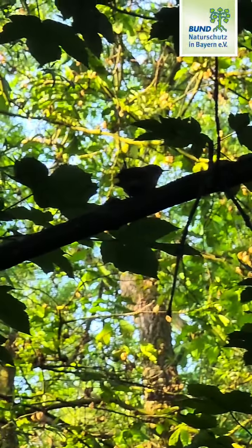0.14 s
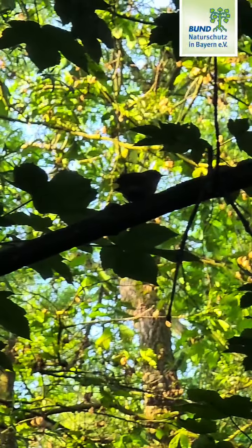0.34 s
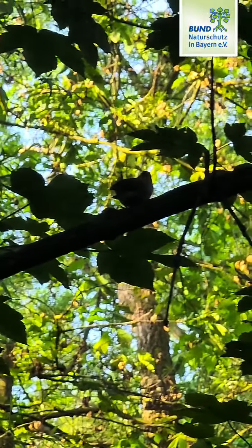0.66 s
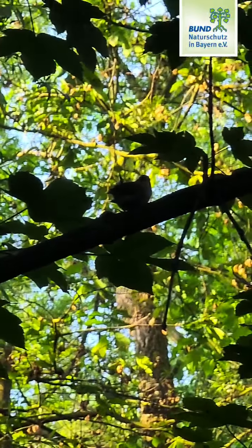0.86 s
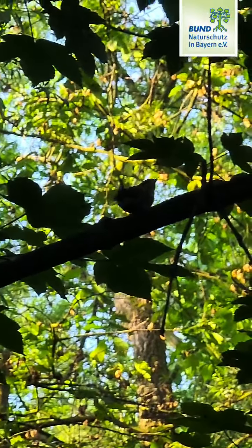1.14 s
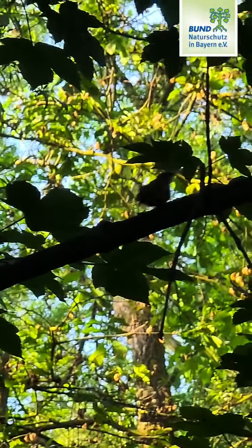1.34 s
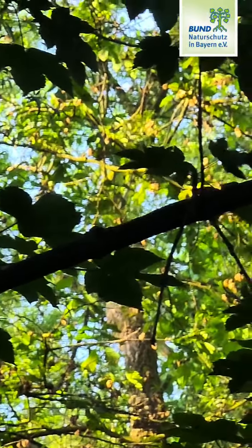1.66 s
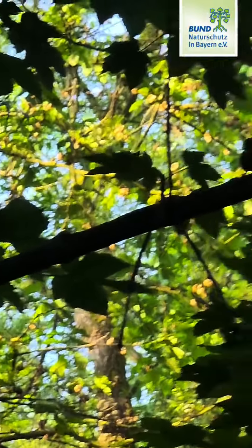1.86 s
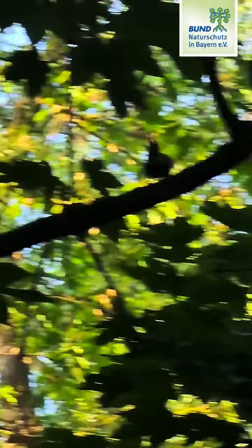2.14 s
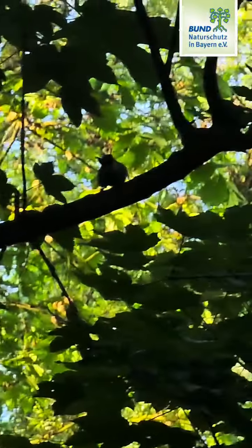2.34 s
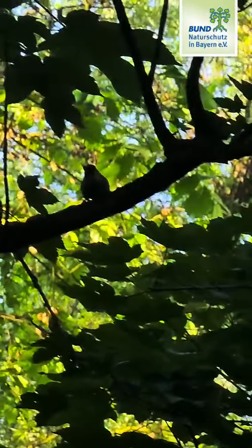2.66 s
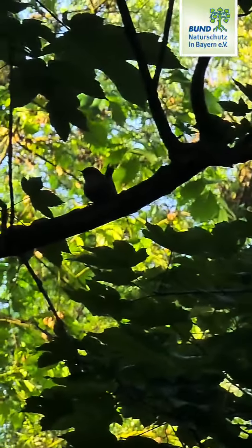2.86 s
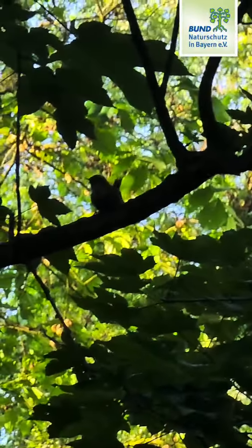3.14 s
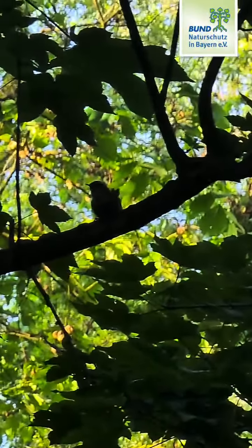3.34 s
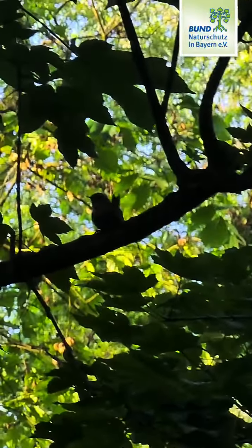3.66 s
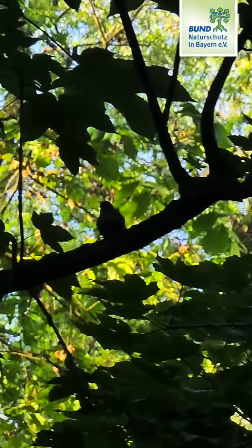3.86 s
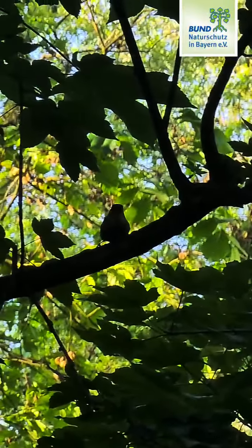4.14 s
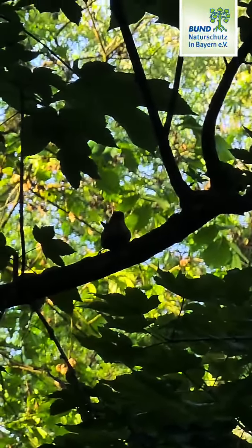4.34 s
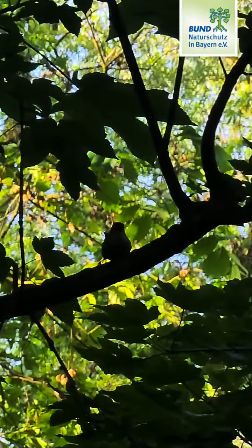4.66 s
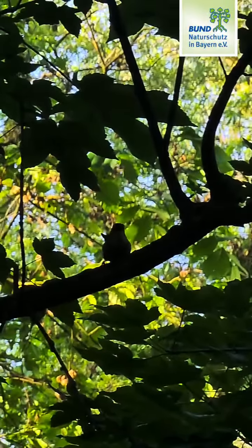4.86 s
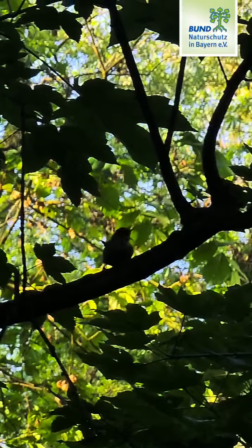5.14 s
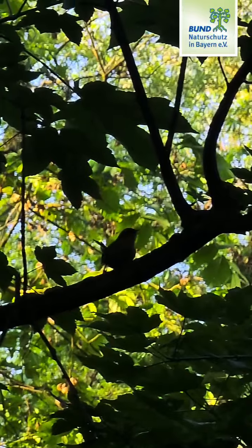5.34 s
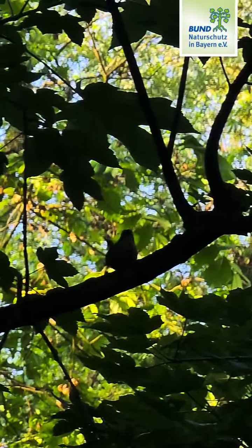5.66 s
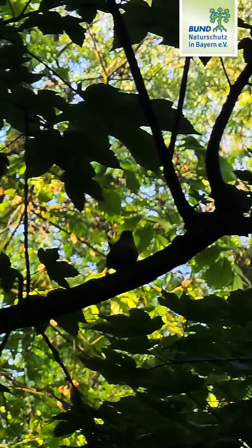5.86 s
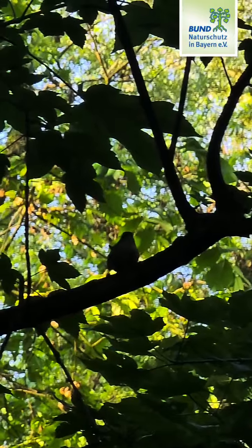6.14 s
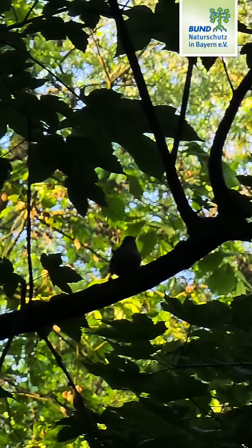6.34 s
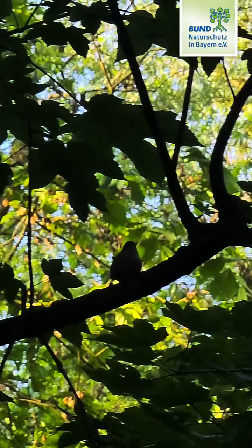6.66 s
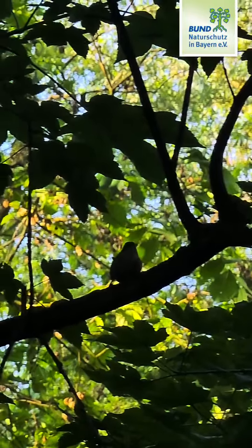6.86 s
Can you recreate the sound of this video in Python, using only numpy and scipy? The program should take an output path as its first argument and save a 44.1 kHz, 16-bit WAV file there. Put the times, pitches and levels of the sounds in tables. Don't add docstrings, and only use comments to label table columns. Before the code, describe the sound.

Distant thrush notes and a thin finch phrase open a leafy wood, then a close small bird bursts into piercing, fast, slurred whistles and trills.

```python
import sys
import numpy as np
from scipy import signal
from scipy.fft import rfft, irfft, next_fast_len
from scipy.io import wavfile
from scipy.ndimage import uniform_filter1d, minimum_filter1d

SR = 44100
rng = np.random.default_rng(int(sys.argv[2]) if len(sys.argv) > 2 else 0)


def ratio_of_db(decibels):
    return 10 ** (np.asarray(decibels, float) / 20)


def master(y):
    cut = np.clip(np.atleast_2d(y).T, -1, 1)
    pcm = np.round(cut * 32767)
    wavfile.write(sys.argv[1], SR, pcm.astype(np.int16))


N = 308700


def on_log(hz, table):
    table_hz, value = np.transpose(table)
    return np.interp(np.log(np.maximum(hz, 1)), np.log(table_hz), value)


def over_time(table):
    return np.interp(np.arange(N) / SR, *np.transpose(table))


def convolve(x, response):
    size = next_fast_len(N + response.shape[-1])
    return irfft(rfft(x, size) * rfft(response, size), size)[..., :N]


def unit_energy(response):
    return response / np.sqrt(np.sum(response ** 2, axis=1, keepdims=True))


def flicker(smooth_s):
    size = max(int(smooth_s * SR), 1)
    wander = uniform_filter1d(uniform_filter1d(rng.standard_normal(N), size), size)
    return wander / np.std(wander)


# frequency in Hz, density in dB per Hz.
HUM_SPECTRUM = [(18, -45.5), (40, -8.5), (63, 2), (90, -8), (141, -16.5), (230, -12.5), (500, -22.5),
                (800, -19), (1600, -30.5), (3000, -19.5), (5500, -36), (7500, -41), (8800, -93.5),
                (14000, -50.5)]


def hum():
    level_db = -53
    drone_swell_db, roar_swell_db, swell_s = 1, 1.27, 0.16
    lorry_s, lorry_span_s, lorry_peak_db = 6.25, 0.45, 5.5
    hz = np.arange(N // 2 + 1) * SR / N
    mid, side = rfft(rng.standard_normal((2, N))) * ratio_of_db(on_log(hz, HUM_SPECTRUM))
    side = side * np.clip(0.14 + (hz / 1500) ** 1.5, 0, 1)
    pair = np.array([0.86 * (mid + side), mid - side])
    lorry_db = lorry_peak_db * np.exp(-((np.arange(N) / SR - lorry_s) / lorry_span_s) ** 2)
    drone = on_log(hz, [(90, 1), (130, 0)])
    roar = on_log(hz, [(350, 0), (600, 1), (1400, 1), (2200, 0)])
    total = irfft(pair * drone, N) * ratio_of_db(drone_swell_db * flicker(swell_s) + lorry_db)
    total = total + irfft(pair * roar, N) * ratio_of_db(roar_swell_db * flicker(swell_s) + .4 * lorry_db)
    total = total + irfft(pair * (1 - drone - roar), N)
    return total / np.std(total) * ratio_of_db(level_db)


def slurs(rows, curve, loudest, first_db, last_db):
    u = np.linspace(0, 1, num=13)
    glide = 1 - (1 - u) ** curve
    rise = first_db * (1 - u / loudest) ** 2
    fade = last_db * ((u - loudest) / (1 - loudest)) ** 2
    swell = np.where(u < loudest, rise, fade)
    return [np.transpose([s + u * length, first + (last - first) * glide, db + swell])
            for s, length, first, last, db in rows]


def series(shape, first_s, every_s=0, swell_db=0, count=1):
    return [np.array(shape) + (first_s + k * every_s, 0, k * swell_db) for k in range(count)]


# frequency in Hz, level in dB.
OVERTONE_LEVEL = [(8300, -50.5), (9300, -37), (10300, -38.5), (12000, -29.5), (14000, -24), (15500, -11),
                  (17000, -63.5), (18000, -120)]


def sing(notes, overtone_db, third_db, edge_s, wobble, flutter_db, flutter_s):
    out = np.zeros(N)
    shake, flutter = flicker(0.00087), flicker(flutter_s)
    hoarse, rasp = flicker(0.0018), flicker(.0012)
    for note in notes:
        s, hz, db = np.transpose(note)
        start = max(int((s[0] - edge_s) * SR), 0)
        stop = min(int((s[-1] + edge_s) * SR), N)
        i = np.arange(start, stop)
        t = i / SR
        round_off = max(int(min(0.1 * (s[-1] - s[0]), .007) * SR), 1)
        pitch = uniform_filter1d(np.interp(t, s, hz), round_off) * (1 + wobble * shake[i])
        level_db = uniform_filter1d(np.interp(t, s, db), round_off) + flutter_db * flutter[i]
        edges = np.clip(np.minimum(t - s[0], s[-1] - t) / edge_s + 1, 0, 1) ** 2
        gain = ratio_of_db(level_db) * edges
        phase = 2 * np.pi * np.cumsum(pitch) / SR
        second = ratio_of_db(on_log(2 * pitch, OVERTONE_LEVEL)) * np.sin(2 * phase + .6 * rasp[i])
        third = ratio_of_db(on_log(3 * pitch, OVERTONE_LEVEL) + third_db) * np.sin(3 * phase + 1.1 * rasp[i])
        strain = ratio_of_db(overtone_db) * gain ** 0.22 * (1.38 + 0.5 * hoarse[i])
        out[i] += gain * (np.sin(phase) + strain * (second + third))
    return out


# frequency in Hz, time to fall 60 dB in seconds.
WOOD_DECAY = [(2000, .65), (3000, .68), (4500, .84), (6500, .76), (9000, .6), (14000, .5)]


def wood(tail_db, leaves_db, leaves_s, rise_s):
    size = int(1.5 * SR)
    t, hz = np.arange(size) / SR, np.arange(size // 2 + 1) * SR / size
    noise = rfft(rng.standard_normal((2, size)))
    tail = 0
    for k, (_, t60) in enumerate(WOOD_DECAY):
        share = on_log(hz, [(f, j == k) for j, (f, _) in enumerate(WOOD_DECAY)])
        tail = tail + irfft(noise * share, size) * ratio_of_db(-60 * t / t60)
    tail = tail * (1 - np.exp(-t / rise_s))
    hits = rng.standard_normal((2, size)) * (rng.random((2, size)) < .008)
    branches = hits * np.exp(-t / leaves_s) * (t > .001)
    return ratio_of_db(tail_db) * unit_energy(tail) + ratio_of_db(leaves_db) * unit_energy(branches)


# start in seconds, length in seconds, first and last pitch in Hz, level in dB.
THRUSH_FALLING = [(0, 0.03, 3680, 3570, -49), (.135, 0.018, 3026, 2540, -42), (.2, .04, 2825, 2610, -43),
                  (.503, 0.045, 3200, 2390, -39), (.58, 0.038, 2753, 2120, -44),
                  (1.08, 0.035, 2556, 2300, -42.5), (3.432, 0.032, 3450, 2850, -38),
                  (4.365, 0.019, 3440, 2860, -32), (4.8, .15, 2520, 2036, -51),
                  (4.975, .04, 3340, 3250, -36), (5.02, .022, 3150, 2880, -35.5),
                  (5.355, .045, 3420, 3200, -42), (5.903, 0.03, 3890, 3260, -31.5),
                  (5.928, 0.021, 3250, 3133, -34), (.03, 0.022, 3550, 3336, -39),
                  (.745, .02, 2950, 2600, -44.5), (5.71, 0.024, 2894, 2640, -41.5),
                  (6.215, .055, 2780, 2600, -35), (6.73, 0.042, 2520, 2403, -45),
                  (6.775, 0.032, 2490, 2286, -40.5), (6.82, 0.037, 2590, 2404, -44)]
# start in seconds, length in seconds, first and last pitch in Hz, level in dB.
THRUSH_RISING = [(.13, 0.017, 3664, 4420, -45), (.27, 0.045, 2730, 3190, -46.5),
                 (.548, 0.032, 2400, 2746, -37), (.77, 0.043, 2650, 2955, -37),
                 (.85, 0.026, 2900, 3180, -34), (1.345, 0.024, 4410, 4670, -37.5),
                 (1.55, 0.037, 3280, 3535, -34), (1.59, 0.019, 3470, 3500, -37.5),
                 (2.1, 0.062, 1580, 1750, -52), (2.768, 0.026, 3304, 3900, -32),
                 (2.89, 0.036, 3560, 3824, -39), (3, 0.034, 3470, 3855, -38.5),
                 (3.62, 0.11, 1960, 2114, -63.5), (4.66, 0.091, 1400, 2550, -48),
                 (6.048, 0.018, 2332, 3500, -46), (6.07, 0.079, 3006, 3190, -31.5),
                 (6.545, 0.015, 4300, 5200, -40), (6.69, 0.019, 4970, 5085, -35),
                 (6.955, .045, 2800, 3165, -44)]
# start in seconds, length in seconds, pitch in Hz, level in dB.
THRUSH_HELD = [(0.041, 0.013, 3420, -38), (0.078, 0.096, 3276, -41), (0.279, 0.046, 3330, -47.5),
               (0.336, 0.029, 3460, -41), (0.37, 0.025, 3523, -39.5), (2.027, 0.021, 1746, -54.5),
               (2.353, 0.029, 3060, -32), (2.55, 0.037, 3520, -37.5), (3.51, 0.064, 2730, -45.5),
               (3.598, 0.069, 2815, -49.5), (3.74, 0.42, 2174, -61.5), (4.431, 0.092, 3030, -58),
               (5.125, 0.19, 2292, -50.5), (5.47, 0.092, 4670, -43), (5.743, 0.025, 2748, -33.5),
               (5.846, 0.065, 3027, -41), (0.211, .025, 2730, -46), (0.792, 0.026, 2970, -41),
               (5.802, 0.035, 3025, -32), (6.166, 0.041, 3010, -40.5), (6.47, 0.02, 3400, -52),
               (6.5, .03, 3500, -51), (6.574, 0.031, 4855, -27), (6.703, 0.018, 4760, -39),
               (6.83, .035, 3386, -47), (6.068, .025, 3000, -32), (6.556, .014, 5250, -33),
               (6.905, .035, 2980, -45), (6.295, .025, 2720, -42), (6.55, .02, 3000, -48)]
# time in seconds, left minus right in dB.
THRUSH_PAN = [(0, -1), (1.2, 0), (3, 0.5), (4.9, 2.5), (6.4, 0), (6.52, -9.5), (6.72, -7.5), (6.75, -0.5)]


def thrushes():
    sag = 0.98
    held = [(s, length, hz, hz * sag, db) for s, length, hz, db in THRUSH_HELD]
    notes = (slurs(THRUSH_FALLING, curve=1.2, loudest=0.32, first_db=-3.0, last_db=-4.0)
             + slurs(THRUSH_RISING, curve=1.6, loudest=0.82, first_db=-9.5, last_db=-1.5)
             + slurs(held, curve=1.1, loudest=0.39, first_db=-6.5, last_db=-9))
    song = sing(notes, overtone_db=-15.0, third_db=-15.0, edge_s=0.0061, wobble=0.004,
                flutter_db=3, flutter_s=0.0074)
    echo = convolve(song, wood(tail_db=-6.0, leaves_db=-7, leaves_s=0.011, rise_s=0.024))
    heard = ratio_of_db(-1) * song + echo
    pan_db = over_time(THRUSH_PAN)
    return heard * ratio_of_db(np.array([pan_db, -pan_db]) / 2)


# start in seconds, length in seconds, first and last pitch in Hz, level in dB.
DISTANT_CHIPS = [(0.102, 0.037, 7500, 7200, -67), (1.1, .12, 8800, 9100, -67), (.35, .03, 6900, 6700, -61),
                 (0.21, 0.036, 7600, 5600, -60.5), (0.14, 0.054, 6100, 4800, -58),
                 (0.24, 0.065, 5900, 4300, -50), (.47, 0.043, 8200, 5500, -58.5),
                 (3.09, .014, 3210, 2010, -59.5), (3.098, 0.013, 3250, 2400, -47.5),
                 (3.197, 0.013, 3300, 2100, -59.5), (3.204, 0.0096, 2800, 2089, -54),
                 (5.283, 0.007, 4400, 5700, -47), (5.37, 0.006, 5600, 4370, -46),
                 (6.424, .014, 6600, 5500, -48), (6.436, .012, 6300, 4300, -47),
                 (6.443, .022, 4600, 3400, -51), (6.49, .03, 5200, 5300, -52.5),
                 (6.473, 0.011, 5940, 4650, -47.5)]
# seconds after start, pitch in Hz, level in dB.
THIN_SEEP = [(0, 7500, -61), (.03, 7900, -57), (.085, 8450, -58), (.14, 8500, -66)]
# seconds after start, pitch in Hz, level in dB.
FINCH_TICK = [(0, 6300, -58), (.008, 5635, -40), (.016, 5600, -50)]
# seconds after start, pitch in Hz, level in dB.
FINCH_LONG_STROKE = [(-.014, 7300, -58), (0, 5833, -48), (.022, 4944, -42), (.038, 4400, -42),
                     (.052, 3450, -40), (.082, 2200, -54)]
# seconds after start, pitch in Hz, level in dB.
FINCH_SHORT_STROKE = [(0, 5495, -40), (.022, 3570, -34.5), (.038, 2800, -39.5), (.075, 1905, -66)]
# seconds after start, pitch in Hz, level in dB.
FINCH_ROLLED = [(0, 2855, -47), (.018, 1975, -55), (.024, 2778, -41), (.034, 3053, -37),
                (.048, 3745, -39.5)]
# start in seconds, length in seconds, first and last pitch in Hz, level in dB.
FINCH_FLOURISH = [(1.64, 0.041, 2900, 1784, -49.5), (2.243, 0.014, 3610, 3330, -36),
                  (2.264, 0.02, 3404, 3080, -36), (2.29, .018, 3200, 2900, -37.5),
                  (2.335, 0.025, 2910, 1976, -45), (2.385, 0.072, 3103, 1878, -43.5),
                  (2.5, .04, 3486, 2484, -36), (2.57, 0.05, 2950, 2303, -43),
                  (2.64, 0.076, 2920, 1995, -49), (2.44, .04, 3960, 3150, -46),
                  (2.53, 0.035, 3910, 3400, -43.5), (2.6, .04, 3850, 2900, -43.5),
                  (2.69, 0.054, 3816, 2490, -50.5)]
# time in seconds, direct sound in dB.
FINCH_DIRECT = [(.7, -11), (1, -5), (1.3, 0.5), (1.7, 1), (2.2, -0.5), (2.35, -2.5), (3.3, -3.5), (6, -7)]


def finch():
    notes = (series(FINCH_TICK, first_s=.4, every_s=0.1745, swell_db=0.5, count=5)
             + series(FINCH_LONG_STROKE, first_s=.422, every_s=.178, swell_db=2.0, count=5)
             + series(FINCH_SHORT_STROKE, first_s=1.298, every_s=.131, swell_db=0.5, count=3)
             + series(FINCH_ROLLED, first_s=1.686, every_s=.0715, count=7)
             + series(THIN_SEEP, first_s=.27, every_s=.322, count=3)
             + slurs(FINCH_FLOURISH + DISTANT_CHIPS, curve=1.1, loudest=0.27, first_db=-6.5, last_db=-11.0))
    song = sing(notes, overtone_db=-6.0, third_db=-9.5, edge_s=0.0043, wobble=0.014,
                flutter_db=5.5, flutter_s=.004)
    direct = ratio_of_db(over_time(FINCH_DIRECT)) * song
    return direct + convolve(song, wood(tail_db=2.5, leaves_db=-2, leaves_s=.02, rise_s=.03))


# start and length in seconds, first and last Hz, level in dB.
SETTLING_SLURS = [
    (1.235, .055, 5770, 5130, -22),
    (2.05, 0.15, 8600, 6520, -10),
    (3.053, .07, 4750, 3900, -15),
    (4.965, 0.03, 4320, 4080, -20),
    (5.016, 0.08, 4010, 3930, -17),
    (5.4, .058, 3650, 3960, -17),
    (5.845, 0.031, 4700, 4010, -23.5),
]
# start and length in seconds, first and last Hz, level in dB.
STRUCK_WHISTLES = [
    (4.649, .067, 5700, 3950, -12.5),
    (5.808, 0.043, 5454, 4862, -12.5),
]
# start and length in seconds, first and last pitch in Hz, level in dB.
STRAIGHT_STROKES = [
    (1.443, 0.018, 6620, 6650, -23),
    (1.466, 0.018, 6550, 6390, -21),
    (1.503, 0.017, 6630, 6660, -26),
    (2.285, .024, 8850, 7630, -24),
]
# seconds after start, pitch in Hz, level in dB.
RISER_NOTE = [(0, 5760, -31.5), (.007, 5826, -16.5), (.017, 5950, -8), (.026, 6250, -12.5),
              (.036, 6600, -17), (.041, 6560, -30.5)]
# seconds after start, pitch in Hz, level in dB.
HOOK_NOTE = [(0, 5200, -29), (.005, 5500, -12), (.017, 5660, -19), (.028, 5416, -31), (.038, 5086, -20),
             (.062, 4750, -18.5), (.072, 4250, -24), (.086, 3860, -32)]
# seconds after start, pitch in Hz, level in dB.
CAP_NOTE = [(0, 7950, -41.5), (.028, 7920, -30), (.04, 7840, -14.5), (.052, 7390, -15.5), (.064, 6750, -19),
            (.07, 6670, -30.5)]
# seconds after start, pitch in Hz, level in dB.
PIPED_NOTE = [(0, 5250, -26), (.008, 5150, -15), (.019, 5000, -10), (.035, 4880, -16), (.065, 4780, -10),
              (.085, 4720, -10), (.104, 4700, -18)]
# seconds after start, pitch in Hz, level in dB.
DROP_NOTE = [(0, 6640, -29.5), (.006, 5980, -19.5), (.012, 5200, -9), (.024, 4690, -14), (.03, 4250, -19),
             (.037, 4030, -17.5), (.042, 3940, -28.5)]
# seconds after start, pitch in Hz, level in dB.
SWOOP_NOTE = [(0, 4050, -36.5), (.014, 4133, -23), (.03, 4277, -17), (.05, 4663, -12), (.063, 4970, -16.5),
              (.069, 5155, -7), (.097, 5840, -10.5), (.11, 6380, -19.5), (.125, 7270, -31),
              (.145, 7806, -24.5), (.177, 7020, -32.5)]
# seconds after start, pitch in Hz, level in dB.
TRILL_OPENER = [(0, 5490, -25.5), (.007, 6750, -20), (.014, 6315, -9.5), (.031, 5234, -4),
                (.045, 5450, -11.5), (.06, 5750, -17), (.076, 5130, -27)]
# seconds after start, pitch in Hz, level in dB.
TRILL_STROKE = [(0, 5200, -32), (.006, 5030, -15), (.009, 4700, -21), (.012, 4420, -25),
                (.015, 4230, -18.5), (.019, 4090, -15), (.024, 4040, -19), (.029, 3940, -29)]
# seconds after start, pitch in Hz, level in dB.
QUICK_ARCH_NOTE = [(0, 5300, -22), (.004, 6300, -13), (.011, 6800, -13), (.025, 6350, -9), (.04, 5850, -12),
                   (.056, 5150, -11), (.061, 4950, -24)]
# seconds after start, pitch in Hz, level in dB.
ROUND_ARCH_NOTE = [(0, 4900, -22), (.006, 5700, -12), (.014, 6350, -10), (.021, 6550, -11),
                   (.032, 6000, -14), (.047, 5450, -13), (.053, 5400, -24)]
# seconds after start, pitch in Hz, level in dB.
PICKUP_NOTE = [(0, 3900, -43), (.006, 3930, -31.5), (.022, 3800, -34.5)]
# seconds after start, pitch in Hz, level in dB.
LIFT_NOTE = [(0, 4010, -27.5), (.004, 4150, -23), (.009, 4240, -19), (.015, 4520, -18), (.021, 4790, -25)]
# seconds after start, pitch in Hz, level in dB.
SHELF_NOTE = [(0, 7560, -28), (.006, 7300, -18), (.02, 7234, -19), (.066, 7090, -19), (.074, 6900, -18.5),
              (.082, 6390, -15.5), (.088, 6160, -23.5)]
# seconds after start, pitch in Hz, level in dB.
VEE_NOTE = [(0, 5640, -50), (.008, 8080, -45), (.018, 8490, -26.5), (.028, 7290, -15), (.033, 6610, -14.5),
            (.05, 7350, -17.5), (.072, 7930, -17.5), (.08, 7980, -32.5)]
# seconds after start, pitch in Hz, level in dB.
RATTLE_TICK = [(0, 6900, -30), (.0015, 5900, -16), (.003, 5150, -24)]
# seconds after start, pitch in Hz, level in dB.
BOW_NOTE = [(.005, 5120, -30), (.009, 5770, -10), (.019, 6130, -9), (.034, 6267, -14), (.044, 6000, -13),
            (.054, 5520, -10.5), (.063, 5300, -17)]
# seconds after start, pitch in Hz, level in dB.
LONG_FALL_NOTE = [(0, 8950, -44.5), (.02, 8100, -25), (.05, 8220, -24.5), (.09, 7800, -19.5),
                  (.19, 7400, -22.5), (.215, 7300, -43)]
# seconds after start, pitch in Hz, level in dB.
LOW_HUMP_NOTE = [(0, 4137, -30), (.008, 4250, -21), (.02, 4254, -14), (.027, 4020, -15.5), (.034, 3720, -20.5),
                 (.04, 3535, -31)]
# seconds after start, pitch in Hz, level in dB.
PEAK_NOTE = [(.003, 5520, -36.5), (.01, 6730, -15.5), (.014, 7300, -12.5), (.019, 7870, -16.5),
             (.026, 7240, -14.5), (.034, 6860, -13.5), (.042, 6400, -14), (.049, 6080, -22.5)]


def wren_song():
    return (slurs(SETTLING_SLURS, curve=2.2, loudest=0.3, first_db=-22, last_db=-13.5)
            + slurs(STRUCK_WHISTLES, curve=2.5, loudest=0.11, first_db=-15.0, last_db=-8.5)
            + slurs(STRAIGHT_STROKES, curve=1.1, loudest=0.5, first_db=-13, last_db=-14.5)
            + series(RISER_NOTE, first_s=1.398)
            + series(HOOK_NOTE, first_s=1.531, every_s=.119, swell_db=5.5, count=2)
            + series(CAP_NOTE, first_s=1.746)
            + series(PIPED_NOTE, first_s=1.911, every_s=2.517, swell_db=-1, count=2)
            + series(DROP_NOTE, first_s=2.197)
            + series(SWOOP_NOTE, first_s=2.35, every_s=0.2267, swell_db=-0.86, count=3)
            + series(TRILL_OPENER, first_s=3.152)
            + series(TRILL_STROKE, first_s=3.2395, every_s=.0541, swell_db=0.08, count=9)
            + series(QUICK_ARCH_NOTE, first_s=3.724)
            + series(ROUND_ARCH_NOTE, first_s=3.889)
            + series(PICKUP_NOTE, first_s=3.96, every_s=.2, swell_db=-3.5, count=2)
            + series(LIFT_NOTE, first_s=3.995, every_s=.199, swell_db=0.2, count=2)
            + series(SHELF_NOTE, first_s=4.031, every_s=.198, swell_db=2, count=2)
            + series(VEE_NOTE, first_s=4.546)
            + series(RATTLE_TICK, first_s=4.7515, every_s=.0281, swell_db=1.2, count=5)
            + series(BOW_NOTE, first_s=4.886)
            + series(LONG_FALL_NOTE, first_s=5.145)
            + series(LOW_HUMP_NOTE, first_s=5.487, every_s=.086, swell_db=-1.5, count=3)
            + series(PEAK_NOTE, first_s=5.722))


def floor_bounce():
    late_s, spread_s = .0083, .00012
    left_db, right_db = -6.5, -1.5
    t = np.arange(int(2 * late_s * SR)) / SR
    burst = rng.standard_normal((2, len(t))) * np.exp(-.5 * ((t - late_s) / spread_s) ** 2)
    return unit_energy(burst) * ratio_of_db([[left_db], [right_db]])


# time in seconds, left minus right in dB.
HEAD_TURN = [(1.2, -1), (2.399, 0), (3.8, 1), (4.449, 1), (4.9, -2), (5.3, -0.5), (5.55, 2), (5.75, -3)]
# frequency in Hz, left minus right in dB.
PORT_SHADE = [(3900, 4.5), (4250, 2.5), (4700, -1), (5050, -4), (5650, -10), (6200, -8.5), (7200, -4.5),
              (8000, -5.5)]
# frequency in Hz, right port's lead in radians.
PORT_LEAD = [(4000, 1.0), (4600, 1.7), (5250, .3), (5650, -.4), (6300, -2.2), (7500, -3.0), (9000, -3.4),
             (12000, -4.9)]


def wren():
    song = sing(wren_song(), overtone_db=-6.5, third_db=-10.0, edge_s=0.0021, wobble=0.0006,
                flutter_db=2.5, flutter_s=0.003)
    hz = np.arange(N // 2 + 1) * SR / N
    shade = ratio_of_db(on_log(hz, PORT_SHADE) / 2)
    right = np.exp(1j * on_log(hz, PORT_LEAD)) / shade
    ports = irfft(rfft(song) * np.array([shade, right]), N)
    pan_db = over_time(HEAD_TURN)
    direct = ports * ratio_of_db(np.array([pan_db, -pan_db]) / 2)
    bounce = convolve(song, floor_bounce())
    echo = convolve(song, wood(tail_db=-10.5, leaves_db=-6.0, leaves_s=0.02, rise_s=0.0031))
    return direct + bounce + echo * ratio_of_db([[-1.5], [1.5]])


def scene():
    return hum() + thrushes() + finch() + wren()


def band_limit(x):
    return signal.sosfilt(signal.butter(12, 15950, fs=SR, output="sos"), x)


def record(dry):
    bend_power, haze_db, haze_hz = 0.19, -8.5, 11800
    bent = dry * np.abs(dry) ** bend_power
    high_pass = signal.butter(10, haze_hz, "high", fs=SR, output="sos")
    heard = dry + ratio_of_db(haze_db) * signal.sosfilt(high_pass, bent)
    room = np.minimum(.96 / (np.abs(heard).max(axis=0) + 1e-9), 1)
    gain = uniform_filter1d(minimum_filter1d(room, size=201), size=201)
    return band_limit(heard * gain)


dry = scene()
out = record(dry)
master(out)
```